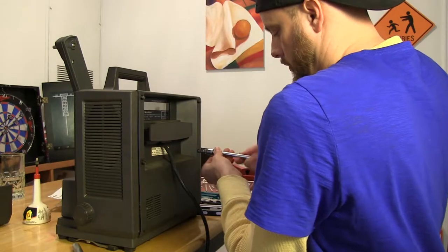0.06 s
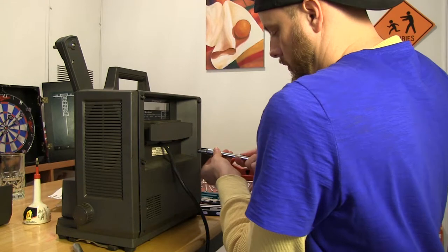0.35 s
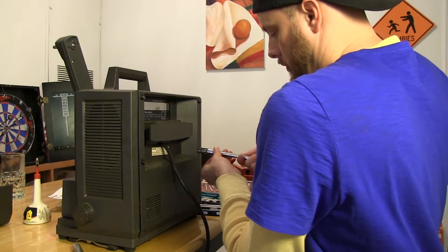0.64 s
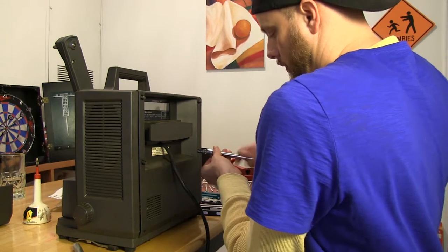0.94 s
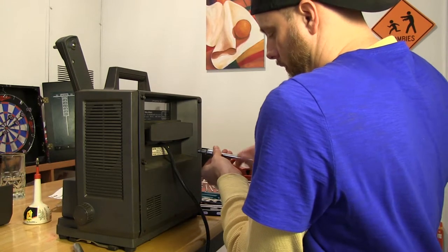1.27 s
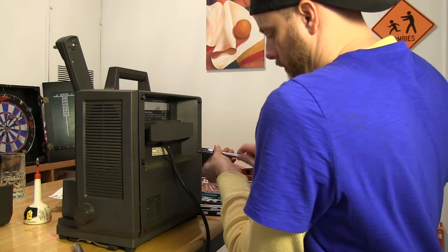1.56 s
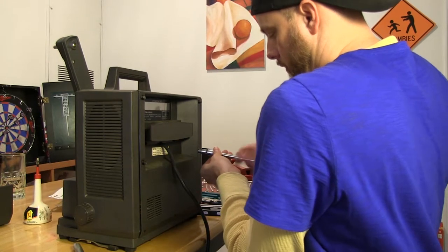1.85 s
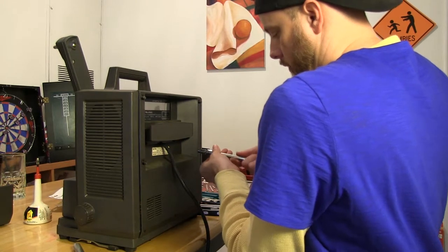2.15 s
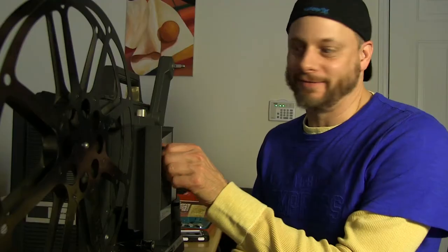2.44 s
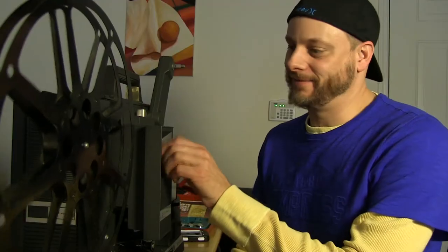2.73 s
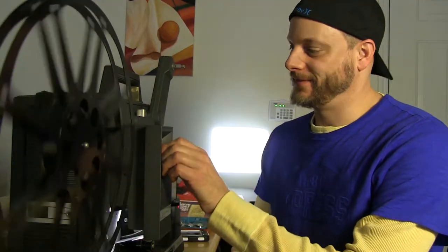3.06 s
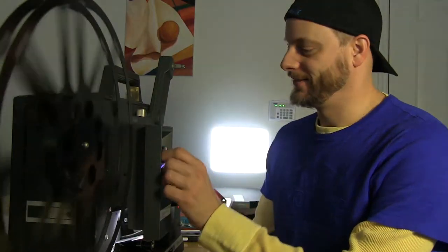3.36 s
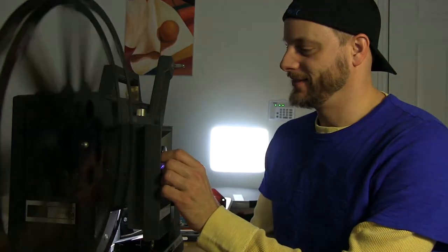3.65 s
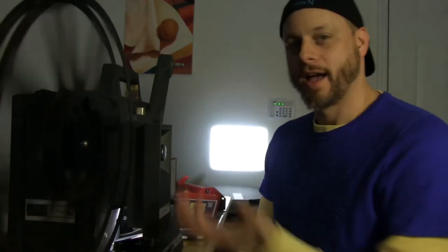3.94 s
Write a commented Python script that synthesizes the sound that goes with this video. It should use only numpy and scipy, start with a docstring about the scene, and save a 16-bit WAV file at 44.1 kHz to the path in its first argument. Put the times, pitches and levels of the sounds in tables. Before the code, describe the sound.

Parts of a film projector clack and scrape by hand over faint room rumble. Then a rotary switch clicks twice and the projector starts, its motor humming and fan whirring under a fast, ticking rattle in a small room.

```python
"""Film projector starting up

In a small quiet room the mechanism is worked by hand: six bunches of clacks, scrapes, one squeak. The room
rumble cuts out, a rotary switch clicks faintly and then snaps twice, and the machine runs up: motor hum, fan
whir, cam and claw pulling the film down frame by frame, and a sharp tick at each turn of the drive."""
import sys
import numpy as np
from scipy import signal
from scipy.fft import rfft, irfft, next_fast_len
from scipy.io import wavfile
from scipy.ndimage import map_coordinates

SR = 44100
rng = np.random.default_rng(int(sys.argv[2]) if len(sys.argv) > 2 else 0)


def output_pcm(signal):
    """Save a mono or channel-first signal as 16-bit PCM at the path in sys.argv[1].

    Samples are clipped to [-1, 1] before scaling.
    """
    pcm = np.clip(np.atleast_2d(signal).T, -1, 1) * 32767
    wavfile.write(sys.argv[1], SR, np.round(pcm).astype(np.int16))


N = 176400
T = np.arange(N) / SR
AGE = T[:SR // 3]  # s since a blow
POWER_ON_S, FIRST_FRAME_S, FRAME_HZ = 2.53, 2.8165, 24.0
# spectrum of sliding parts (frequency [Hz], level [dB])
FRICTION_TONE = [(120, -32), (300, 9.5), (600, 4.5), (1000, 4.5), (2000, -9.5), (3500, -18), (6000, -20.5),
                 (9000, -32.5), (16000, -42)]


def amp(db):
    return 10 ** (np.asarray(db) / 20)


def unit(x):
    return x / np.sqrt(np.mean(x ** 2) + 1e-20)


def along(points, hz):
    """Interpolate (frequency [Hz], value) points on a log axis."""
    point_hz, values = np.transpose(points)
    return np.interp(np.log(hz + 1), np.log(point_hz + 1), values)


def wobble(knots_per_s):
    """Smooth random curve."""
    return map_coordinates(rng.standard_normal(800), [T * knots_per_s], mode="wrap")


def noise(tone, size=N):
    """Unit-rms noise with the given spectrum."""
    hz = np.fft.rfftfreq(size, 1 / SR)
    return unit(irfft(rfft(rng.standard_normal(size)) * amp(along(tone, hz)), size))


def burst(tone, t60_s, attack_s):
    """Many close modes struck at once: decaying coloured noise."""
    envelope = amp(-60 * AGE / t60_s) * (1 - np.exp(-AGE / attack_s))
    low_cut = signal.butter(2, 130, "high", fs=SR)
    struck = signal.lfilter(*low_cut, envelope * noise(tone, size=len(AGE)))
    return unit(struck) * np.sqrt(np.mean(envelope ** 2))


def modes(table):
    """Damped sines, slightly different at each blow."""
    out = np.zeros(len(AGE))
    for hz, db, t60_s in table:
        decay = amp(db + rng.normal(0, 2.5) - 60 * AGE / t60_s)
        out += decay * rng.choice([-1, 1]) * np.sin(2 * np.pi * hz * (1 + rng.normal(0, 0.012)) * AGE)
    return out


def add(track, start_s, sound):
    part = track[max(round(start_s * SR), 0):][:len(sound)]
    part += sound[:len(part)]


def in_room(x, wet_db):
    """Direct sound plus a wall tail 5 ms later; treble dies sooner."""
    walls = [(150, 0.37), (1000, 0.36), (5000, 0.33), (14000, 0.27)]  # room decay (frequency [Hz], t60 [s])
    hz, t, spectra = signal.stft(rng.standard_normal(SR // 2), SR, nperseg=256)
    tail = signal.istft(spectra * amp(-60 * t / along(walls, hz)[:, None]), SR, nperseg=256)[1]
    response = np.pad(tail / np.linalg.norm(tail), (SR // 200, 0)) * amp(wet_db)
    response[0] = 1
    return signal.fftconvolve(x, response)


def rumble():
    """Low room noise, wavering in level."""
    room_tone = [(15, -42), (25, -21.5), (114, -2), (293, -5.5), (373, -12), (451, -10), (641, -19),
                 (695, -22), (936, -20), (1260, -29.5), (1370, -30), (2280, -35.5), (16000, -63)]  # spectrum (frequency [Hz], level [dB])
    return amp(-47.5 + 1.06 * wobble(14)) * noise(room_tone)


def hush():
    """Faint steady noise floor."""
    hush_tone = [(15, -27), (25, -1), (123, 1), (236, -9), (659, -11), (2480, -25.5), (7920, -33.5),
                 (16000, -38.5)]  # spectrum (frequency [Hz], level [dB])
    return amp(-63) * noise(hush_tone)


def scraping():
    """Parts slide past each other: gritty friction swells and fades with each stroke."""
    strokes = [(0.016, 0.034, -44), (0.307, 0.032, -39.5), (0.685, .035, -39.5), (0.991, 0.025, -33.5),
               (1.328, 0.026, -40.5), (1.689, .03, -36), (2.079, 0.02, -30.5)]  # swells (centre [s], sigma [s], level [dB])
    swell = sum(amp(db) * np.exp(-0.5 * ((T - s) / sigma_s) ** 2) for s, sigma_s, db in strokes)
    grit = unit(amp(2.3 * wobble(190)) * noise(FRICTION_TONE))
    return in_room(amp(-6) * swell * grit, wet_db=-9.5)[:N]


def clacks():
    """Each clack thumps the case, knocks the panels, clicks and stirs a small spring."""
    blows = [(0.267, -24, -46, -60), (0.283, -26, -32.5, -43), (0.3, -16, -28.5, -34),
             (0.338, -30, -41.5, -58), (0.572, -25, -42, -51.5), (0.625, -22.5, -34.5, -55),
             (0.642, -22, -34, -37), (0.651, -19, -33.5, -49), (0.672, -46, -37.5, -62),
             (0.762, -35, -44.5, -50), (0.91, -27, -42, -56), (0.949, -22, -31.5, -48.5),
             (0.971, -17.5, -30.5, -57), (0.986, -19.5, -32, -39), (1.007, -17.5, -28, -59),
             (1.037, -26, -33.5, -47), (1.3, -18, -30.5, -55), (1.332, -18.5, -40, -40),
             (1.364, -24.5, -35.5, -69), (1.385, -33, -40.5, -60), (1.423, -46, -43.5, -65),
             (1.598, -27.5, -42.5, -55), (1.635, -27, -37.5, -49.5), (1.665, -15, -20, -34.5),
             (1.692, -12, -17, -26), (1.738, -25, -27.5, -37), (1.786, -29, -30.5, -43),
             (1.945, -30.5, -56, -51.5), (2.048, -25, -37.5, -54), (2.062, -19.5, -31, -36.5),
             (2.09, -20, -31.5, -37.5), (2.255, -41, -46, -75), (2.359, -40, -39, -50.5)]  # (time [s], thump [dB], knock [dB], click [dB])
    case_modes = [(279.6, -4.5, 0.2), (418, -1, .1), (497, -6.5, 0.36), (641, 1, 0.1), (867, -8.5, 0.073),
                  (1245, -5, .06), (1490, -19, 0.14), (1820, -15, 0.15), (2910, -9, 0.013)]  # resonances (frequency [Hz], level [dB], t60 [s])
    # spectra of the struck parts (frequency [Hz], level [dB])
    case_tone = [(50, -60), (120, -5), (190, -4), (285, 5.5), (370, -3.5), (490, -4), (650, -22),
                 (1100, -29), (3000, -65)]
    knock_tone = [(200, -19), (420, -5), (520, 0), (640, 6), (740, -13), (860, 0.5), (1020, -7),
                  (1250, -8.5), (1600, -12), (1870, -11), (2500, -20.5), (5000, -44.5)]
    click_tone = [(500, -37), (1400, 5), (2200, -2.5), (3100, 3), (4500, -4.5), (6000, -2), (9000, -10),
                  (12000, -23), (16000, -42)]
    spring_tone = [(3000, -45), (5000, -7), (5600, 6), (6100, -1), (6600, -19), (8000, -38), (12000, -50)]
    out = np.zeros(N)
    for s, thump_db, knock_db, click_db in blows:
        thump = amp(-11) * burst(case_tone, t60_s=0.1, attack_s=0.00084)
        ring = amp(-19.5) * modes(case_modes)
        knock = amp(2.5) * burst(knock_tone, t60_s=0.054, attack_s=0.0012)
        click = amp(4) * burst(click_tone, t60_s=0.021, attack_s=0.00037)
        spring = amp(-25.5) * burst(spring_tone, t60_s=0.3, attack_s=0.0019)
        clack = amp(thump_db) * (thump + ring) + amp(knock_db) * knock + amp(click_db) * (click + spring)
        add(out, s, in_room(clack, wet_db=-9.5))
    return out


def squeak():
    """A dry bearing slips once, with unsteady pitch."""
    harmonics_db = [-34, -42.5, -51, -57, -64]  # from the fundamental up (level [dB])
    start_s, length_s, pitch_hz = 1.0615, 0.014, 2385
    jitter = 0.017 * noise([(500, 5), (1500, -40)], size=len(AGE))
    phase = 2 * np.pi * np.cumsum(pitch_hz * (1 + jitter)) / SR
    tone = sum(amp(db) * np.sin(k * phase) for k, db in enumerate(harmonics_db, 1))
    envelope = np.sin(np.pi * np.clip(AGE / length_s, 0, 1))
    out = np.zeros(N)
    add(out, start_s, in_room(tone * envelope, wet_db=-9))
    return out


def switch():
    """The knob snaps into a detent, rings faintly and thuds in the case."""
    snaps = [(2.481, -58, -56), (2.524, -18, -31.5), (2.78, -15.5, -26.5)]  # (time [s], snap [dB], thud [dB])
    # knob and case spectra (frequency [Hz], level [dB])
    snap_tone = [(290, -30), (500, -6), (919, 2), (1420, -18), (2130, 1), (2430, -4), (3980, -2.5),
                 (4530, -3.5), (5090, -1.5), (7980, -6.5), (8830, -5.5), (11600, -1.5), (16000, -18)]
    ring_tone = [(1500, -12), (3500, 12), (6000, -6), (9000, -13), (11500, -11), (13500, -18), (16000, -21)]
    thud_tone = [(60, -27), (190, -0.5), (300, 2.5), (450, -1), (900, -6.5), (1500, -7.5), (4000, -33)]
    out = np.zeros(N)
    for s, snap_db, thud_db in snaps:
        snap = amp(4.5) * burst(snap_tone, t60_s=0.027, attack_s=0.002)
        ring = amp(-25.5) * burst(ring_tone, t60_s=0.34, attack_s=0.0025)
        thud = amp(thud_db) * burst(thud_tone, t60_s=0.11, attack_s=0.0034)
        add(out, s, in_room(amp(snap_db) * (snap + ring) + thud, wet_db=-14.5))
    return out


def fan():
    """Broad whir, throbbing twice a frame."""
    whir_tone = [(24, -62), (40, -32), (75, -26), (91, -44), (112, -15), (140, -31), (159, -10),
                 (237, -7.5), (262, -7.5), (312, -5.5), (337, -11.5), (455, -6.5), (529, -11), (663, -3),
                 (873, -7.5), (1480, -10.5), (3140, -24.5), (3650, -24), (5870, -27), (7540, -30.5),
                 (10200, -40.5), (14500, -40), (16000, -60)]  # spectrum (frequency [Hz], level [dB])
    throb_db = 0.95 * np.cos(4 * np.pi * FRAME_HZ * (T - FIRST_FRAME_S))
    return amp(-40.5 + throb_db) * noise(whir_tone)


def mains():
    """The windings hum once the current is on."""
    hum_hz, rise_s = 119.7, 0.03
    current = np.clip((T - POWER_ON_S) / rise_s, 0, 1)
    return amp(-63.5) * current * np.sqrt(2) * np.sin(2 * np.pi * hum_hz * T)


def motor():
    """Hum lines rise in pitch and level as the motor spins up."""
    lines = [(70.0, -73), (118.4, -58.5), (166.9, -56), (193.8, -56.5), (215.3, -55.5), (263.8, -52),
             (290.7, -54.5), (312.2, -51), (360.7, -53.5), (409.1, -49.5), (457.6, -45.5), (527.6, -59.5),
             (576.0, -63.5), (646.0, -53), (694.4, -55), (769.8, -60), (909.8, -74.5), (1034, -56),
             (1292, -69), (1464, -57), (1486, -60)]  # hum at full speed (frequency [Hz], level [dB])
    spin_up_tau_s = 0.075
    speed = 1 - np.exp(-np.maximum(T - POWER_ON_S, 0) / spin_up_tau_s)
    turned_s = np.cumsum(speed) / SR
    hum = np.zeros(N)
    for hz, db in lines:
        level = amp(db + wobble(5.03)) * np.sqrt(2)
        hum += level * np.sin(2 * np.pi * (hz * turned_s + rng.random()) + 0.06 * wobble(3.97))
    return amp(-0.5) * speed ** 6 * hum


def shuttle():
    """Each frame the cam knocks, the claw clicks into the film and the shuttle chirps."""
    # cam knocks and claw contacts (time in frame [s], level [dB])
    cam = [(-.0015, -30.5), (.0045, -51), (.016, -39.5), (.0215, -45.5), (.027, -35.5)]
    claw = [(.0015, -52), (.0055, -45), (.025, -65), (0.0333, -54)]
    # their spectra (frequency [Hz], level [dB])
    cam_tone = [(70, -44), (170, -2), (300, -9), (470, 12.5), (560, -19), (700, 7), (1000, -6),
                (1500, -19.5), (2300, -6.5), (4000, -50)]
    claw_tone = [(1500, -19), (4000, -3), (8000, -1), (11000, 0), (13000, -5), (14500, -2), (16000, -10)]
    chirp_hz, width_hz, chirp_lag_s = 7360, 450, 0.029
    chirp_tone = [(chirp_hz / 2, -70), (chirp_hz - width_hz, -20), (chirp_hz, 0),
                  (chirp_hz + width_hz, -20), (chirp_hz * 2, -70)]
    alike = 0.45  # share of each knock that repeats every frame
    repeats = [burst(cam_tone, t60_s=0.03, attack_s=0.0013) for _ in cam]
    out = np.zeros(N)
    for s in np.arange(FIRST_FRAME_S, N / SR, 1 / FRAME_HZ):
        for (lag_s, db), repeat in zip(cam, repeats):
            fresh = burst(cam_tone, t60_s=0.021, attack_s=0.00085)
            knock = np.sqrt(alike) * repeat + np.sqrt(1 - alike) * fresh
            add(out, s + lag_s, amp(db + rng.normal(0, 2.3)) * knock)
        for lag_s, db in claw:
            contact_s = s + lag_s + rng.normal(0, 0.0004)
            click = amp(db + rng.normal(0, 1.5)) * burst(claw_tone, t60_s=0.02, attack_s=0.0007)
            add(out, contact_s, click)
        chirp = amp(-44 + rng.normal(0, 1.5)) * burst(chirp_tone, t60_s=0.014, attack_s=0.001)
        add(out, s + chirp_lag_s, chirp)
    jolt = amp(-27.5) * burst(FRICTION_TONE, t60_s=0.065, attack_s=0.0016)  # the film takes up
    add(out, start_s=2.981, sound=jolt)
    return in_room(out, wet_db=-15.5)[:N]


def ticks():
    """A hard tick with a brief metal ring at each turn of the drive."""
    turns = [(2.8892, -26), (3.05, -26), (3.2181, -24), (3.3737, -25.5), (3.5417, -24), (3.7, -24.5),
             (3.8606, -26)]  # (time [s], level [dB])
    tick_tone = [(500, -13), (1500, 2), (2800, 1), (3600, 4.5), (5200, -0.5), (6500, -6.5), (8500, -5.5),
                 (9800, -14), (10800, -22), (16000, -30)]  # spectrum (frequency [Hz], level [dB])
    metal_modes = [(3590, -1.5, 0.033), (3870, -3, 0.029), (9660, -6, 0.035)]  # resonances (frequency [Hz], level [dB], t60 [s])
    out = np.zeros(N)
    for s, db in turns:
        tick = amp(-2) * burst(tick_tone, t60_s=0.022, attack_s=0.0007) + amp(-16) * modes(metal_modes)
        add(out, s, in_room(amp(db) * tick, wet_db=-16))
    return out


def scene():
    """Handling over room rumble, a short hush, then the running machine."""
    run_up = [(2.52, -66), (2.56, -9.5), (2.68, -10.5), (2.76, -3), (2.86, 0), (2.98, -0.5), (4, 0.5)]  # machine gain (time [s], level [dB])
    drop_s, fade_s = 2.397, 0.0014
    before_drop = np.clip((drop_s - T) / fade_s, 0, 1)
    running = amp(np.interp(T, *np.transpose(run_up)))
    out = before_drop * (rumble() + clacks() + scraping() + squeak()) + hush()
    out += switch() + mains() + ticks() + running * (motor() + fan() + shuttle())
    return out[None]


def record(dry):
    """Low-pass with a soft edge."""
    top_hz, edge_hz = 16500, 800
    size = next_fast_len(N + SR // 2)
    edge = np.clip((top_hz - np.fft.rfftfreq(size, 1 / SR)) / edge_hz, 0, 1)
    return irfft(rfft(dry, size) * np.sin(np.pi / 2 * edge) ** 2, size)[..., :N]


dry = scene()
out = record(dry)
output_pcm(out)
```